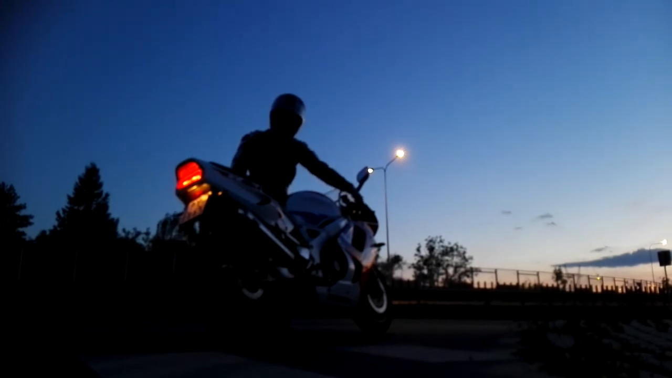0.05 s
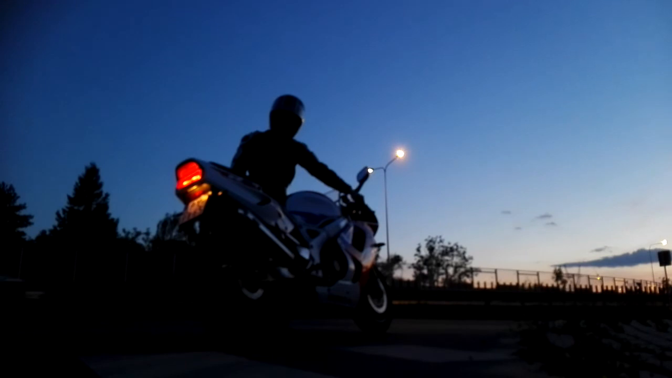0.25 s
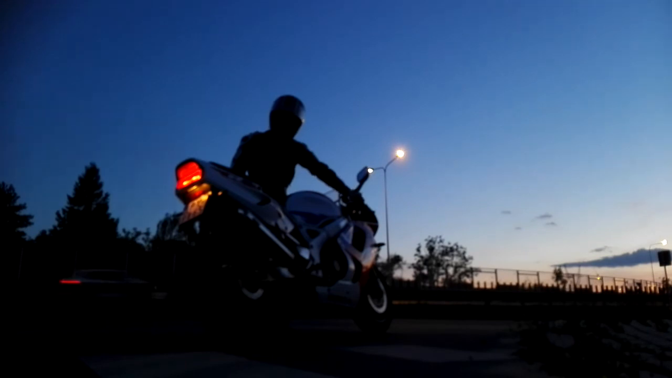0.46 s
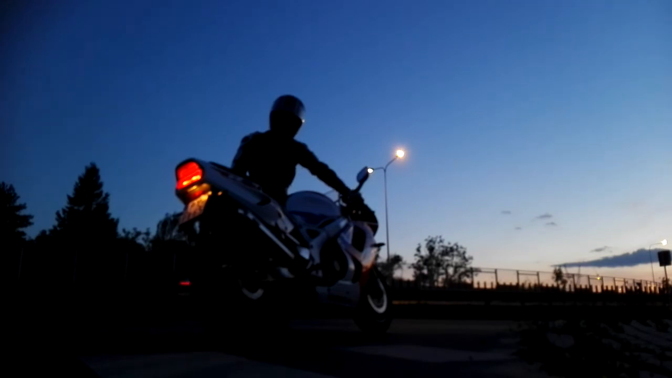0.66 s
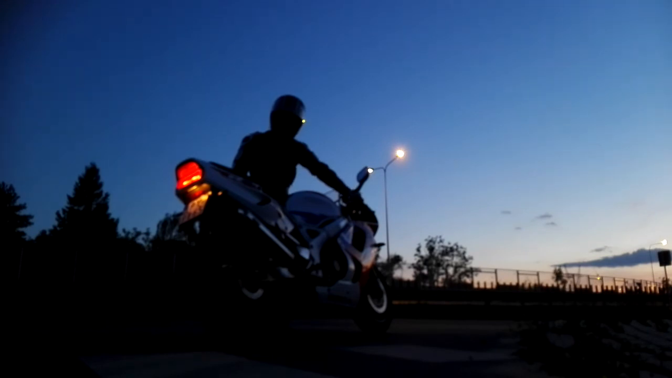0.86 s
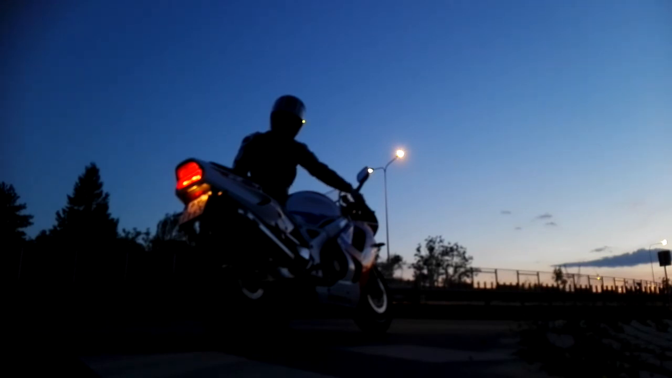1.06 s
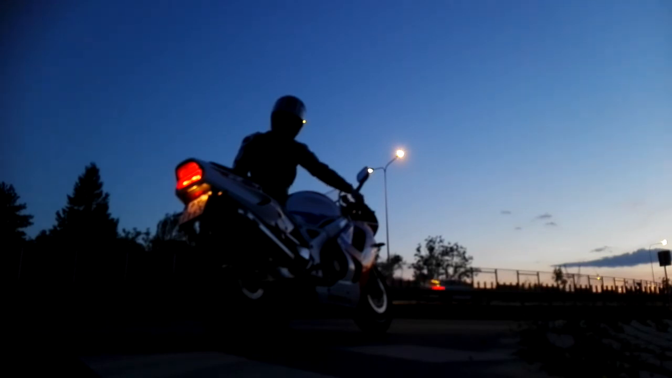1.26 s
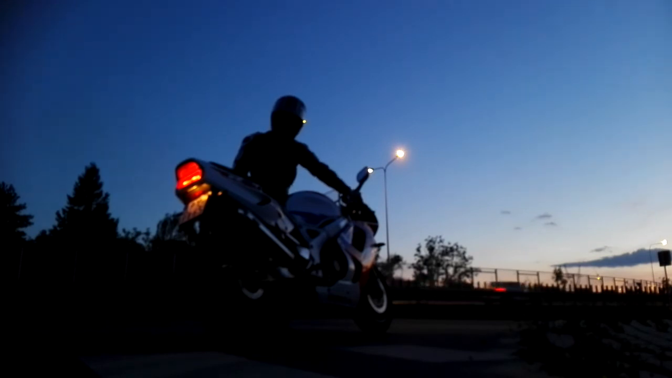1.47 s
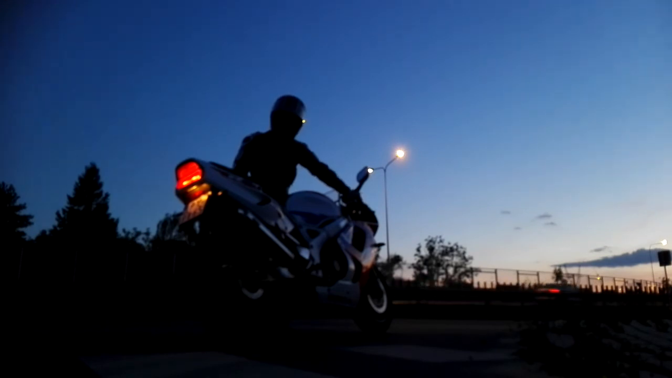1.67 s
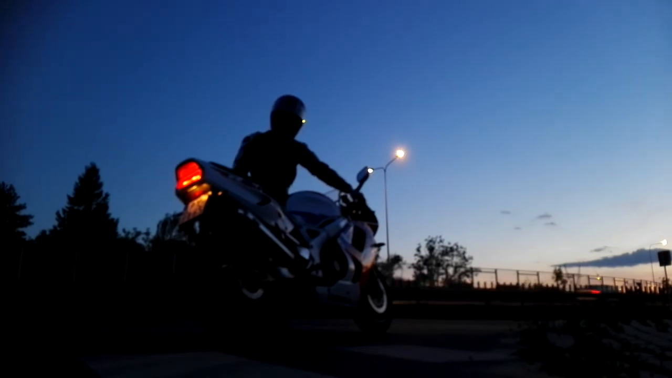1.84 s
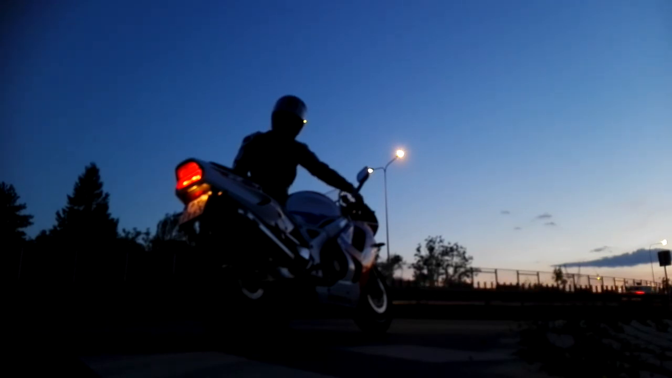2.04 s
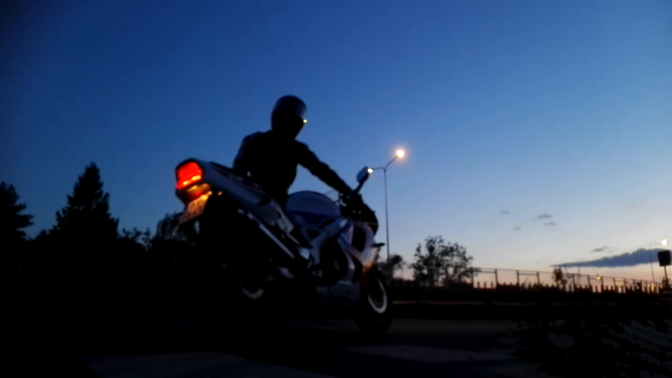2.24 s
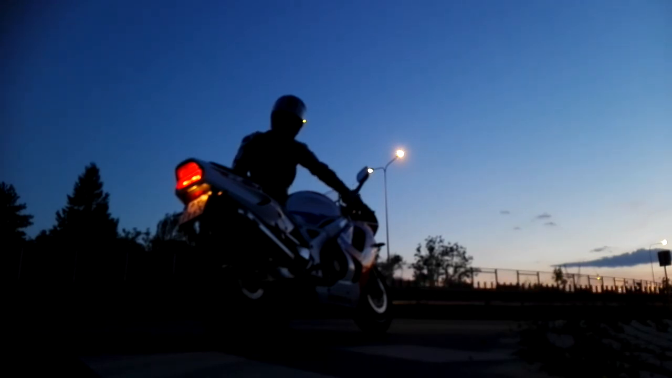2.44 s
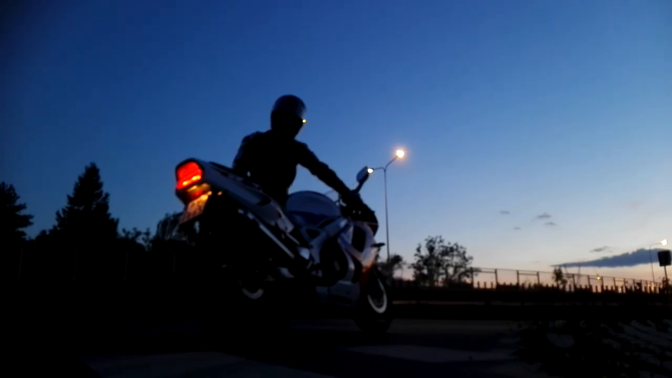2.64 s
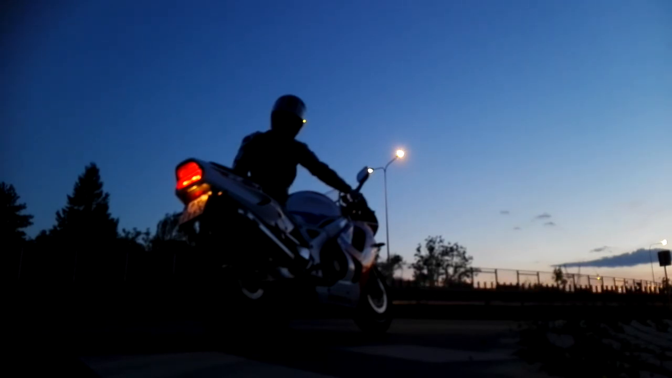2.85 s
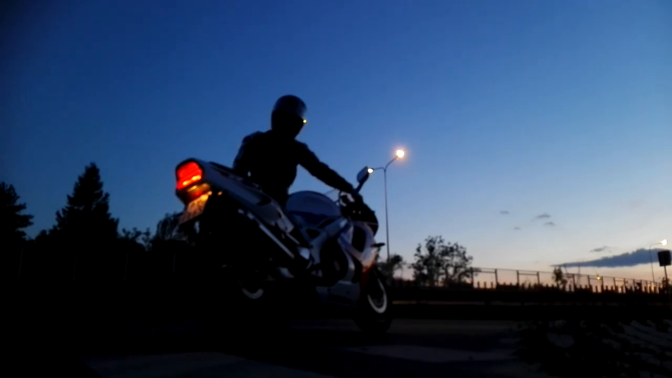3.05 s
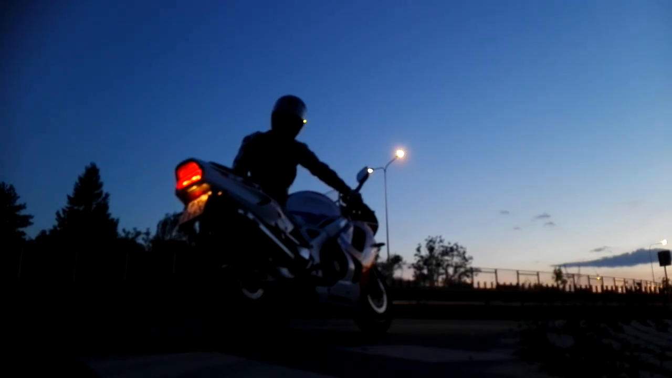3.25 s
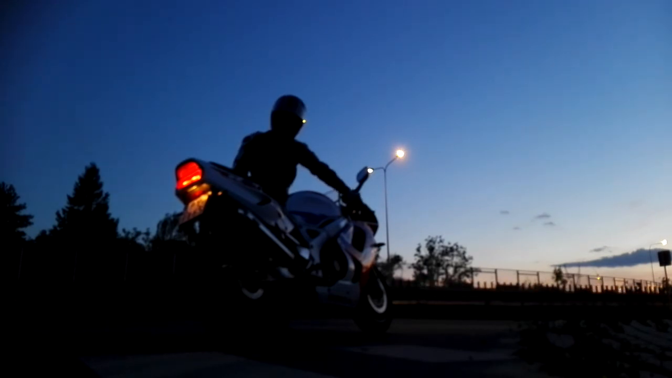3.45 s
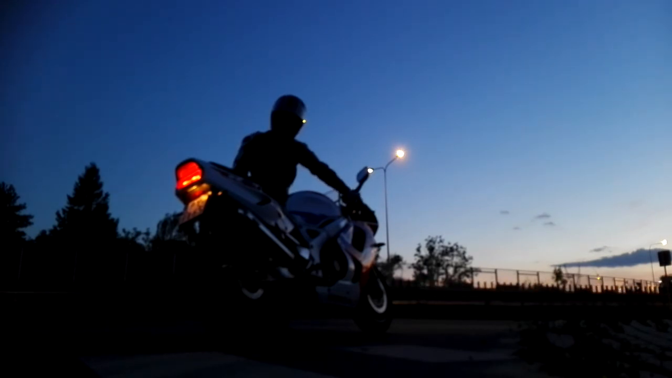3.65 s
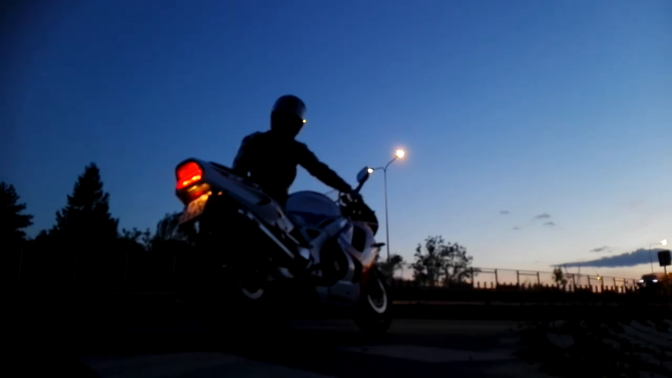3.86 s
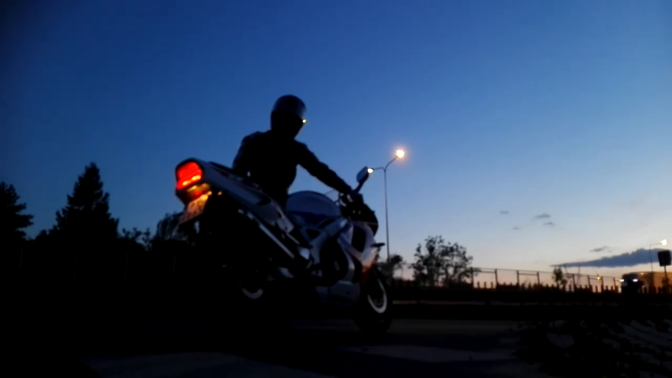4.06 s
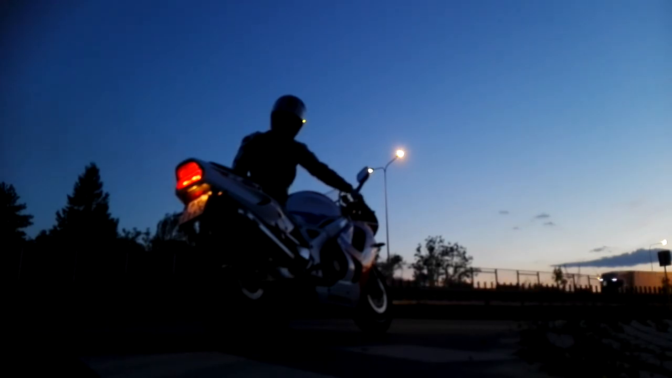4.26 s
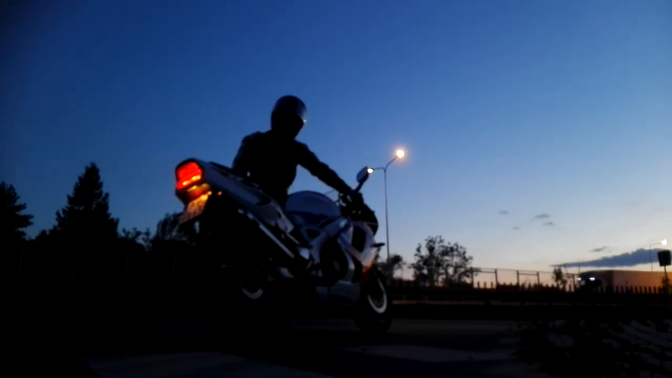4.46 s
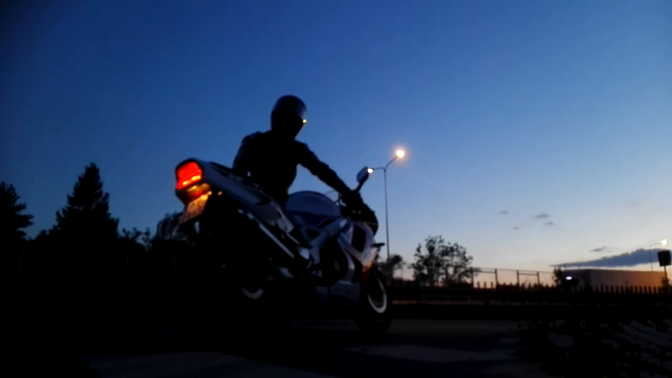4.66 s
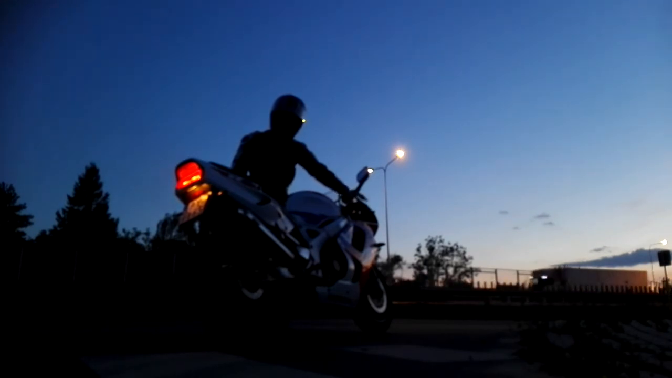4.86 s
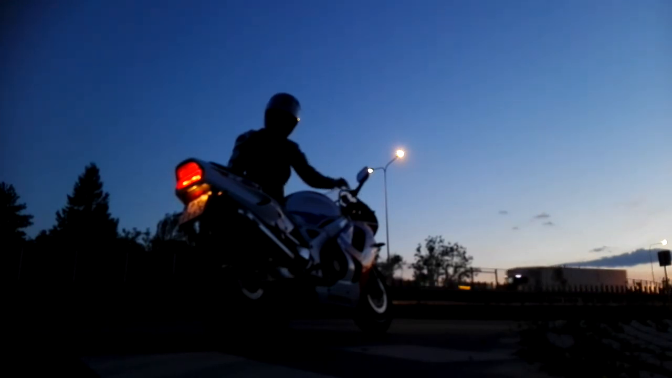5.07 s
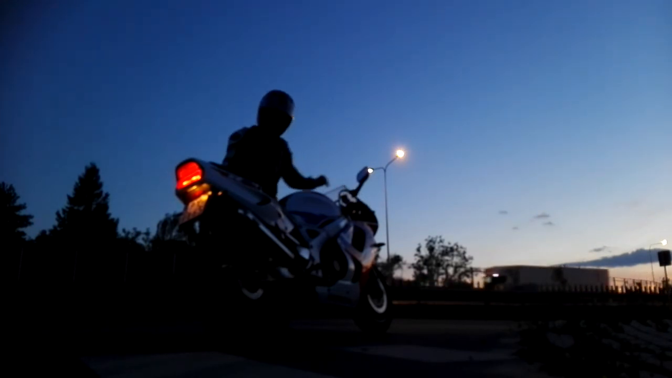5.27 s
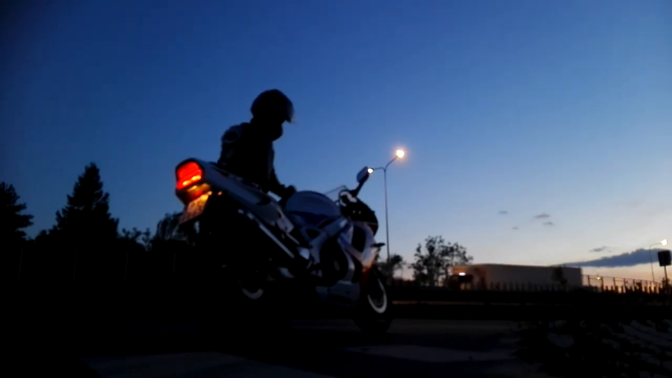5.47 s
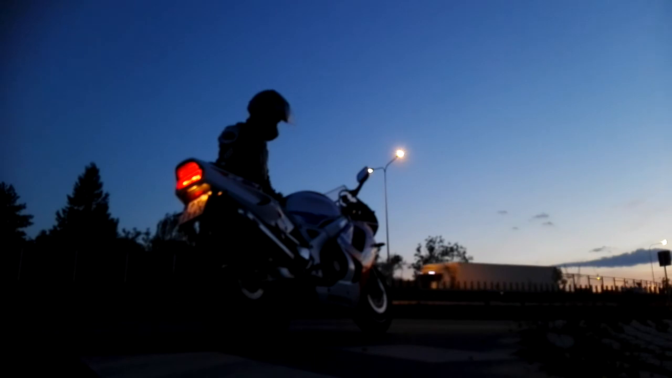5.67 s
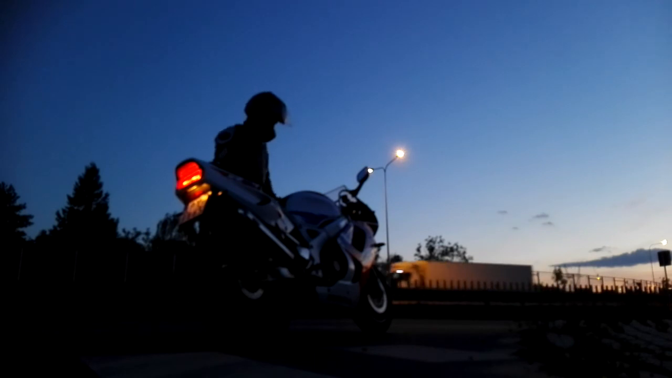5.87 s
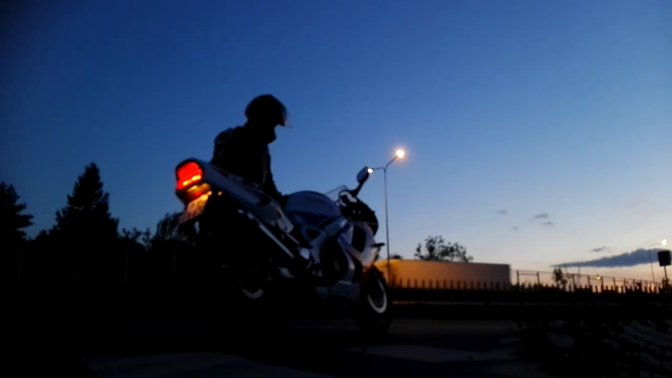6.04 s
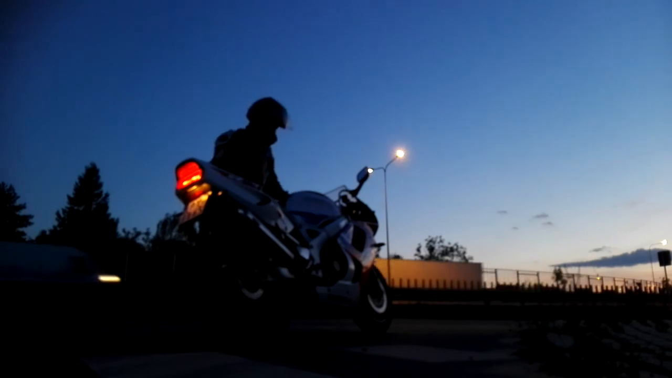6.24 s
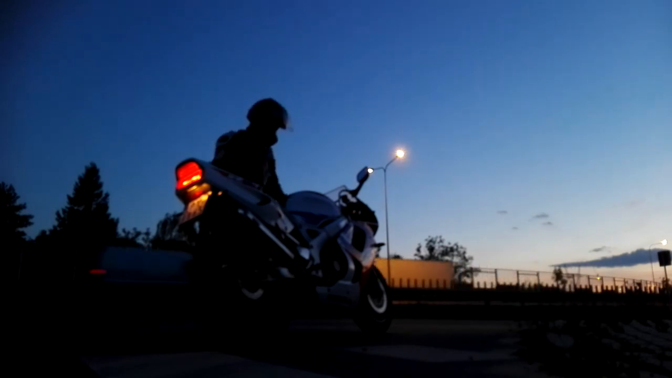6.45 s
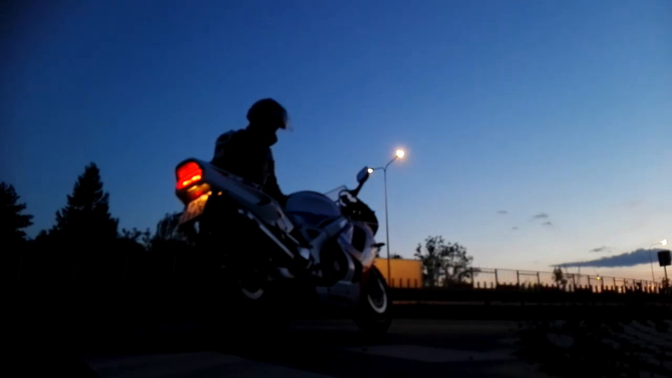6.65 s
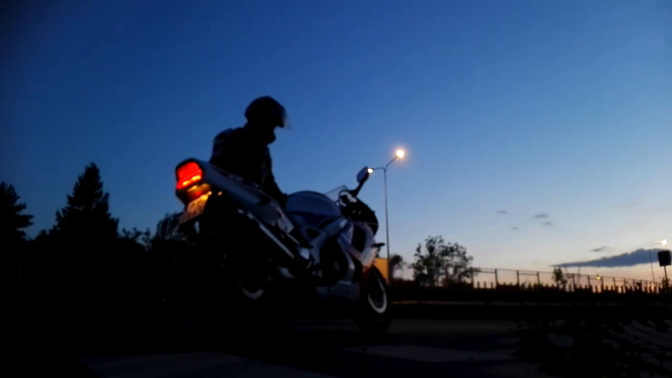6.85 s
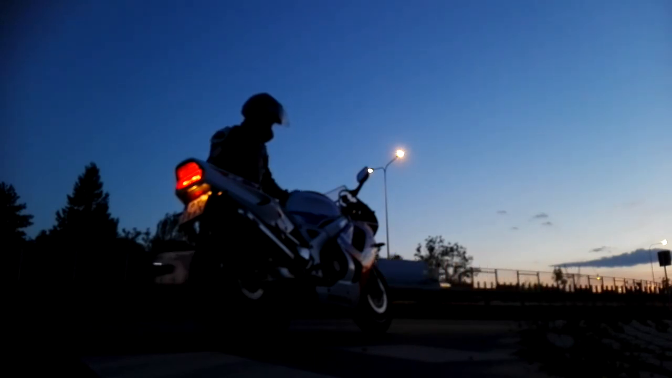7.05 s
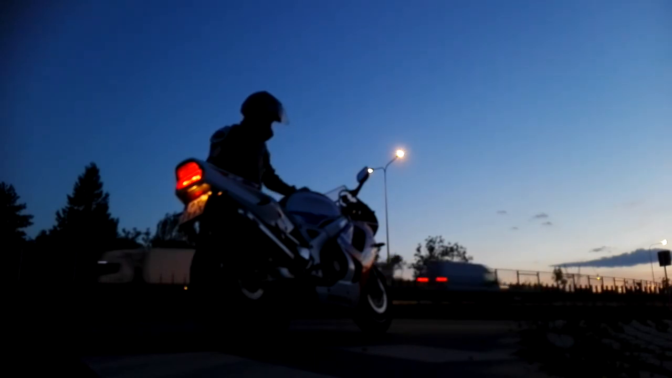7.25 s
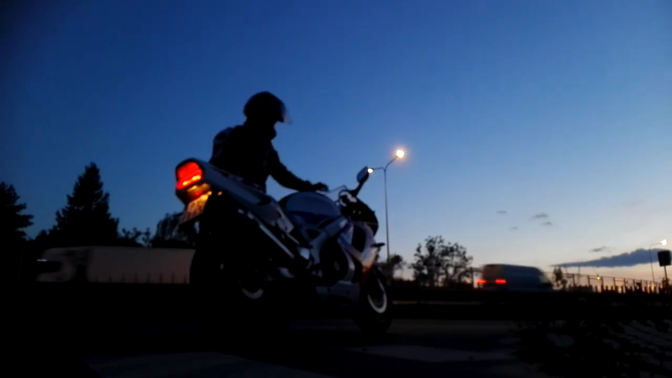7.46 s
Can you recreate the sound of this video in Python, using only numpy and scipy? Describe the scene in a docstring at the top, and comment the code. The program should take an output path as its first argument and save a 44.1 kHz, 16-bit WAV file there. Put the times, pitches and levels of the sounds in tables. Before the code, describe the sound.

Close, raspy motorbike throttle blips scream up and chop into rapid bangs, then the engine runs down to dull uneven thumps over faint traffic.

```python
"""Sport bike revving

A four-cylinder engine is revved hard through a loose, open exhaust: six blips of the throttle, then a lumpy idle.
Five blips are held against the rev limiter, which cuts the spark and chops the sound into harsh bursts.
Engine-locked sines give the tone; clicks, one a firing, ring in the pipe and can for the bark and rasp.
Shaped noise gives the rumble and the faint traffic behind; a gear whines softly as the engine slows."""
import sys
import numpy as np
from scipy import signal
from scipy.fft import rfft, irfft
from scipy.io import wavfile
from scipy.ndimage import uniform_filter1d

SR = 44100
rng = np.random.default_rng(int(sys.argv[2]) if len(sys.argv) > 2 else 0)


def output_pcm(signal):
    """Save a mono or channel-first signal as 16-bit PCM at the path in sys.argv[1].

    Samples are clipped to [-1, 1] before scaling.
    """
    pcm = np.clip(np.atleast_2d(signal).T, -1, 1) * 32767
    wavfile.write(sys.argv[1], SR, np.round(pcm).astype(np.int16))


N = 331191
TIME = np.arange(N) / SR


def from_db(db):
    """Decibels to gain."""
    return 10 ** (np.asarray(db) / 20)


def rms_one(x):
    """Scale to unit power."""
    return x / np.sqrt(np.mean(x ** 2) + 1e-20)


def evened(x):
    """Hold the power near one at every moment, judged over some 40 ms."""
    power = np.maximum(uniform_filter1d(x ** 2, size=1800), 0)
    return x / np.sqrt(power + 1e-12)


def passed(x, hz, kind, order=4):
    """Butterworth filter that lets through the lows or the highs."""
    sos = signal.butter(order, min(hz, SR / 2.2), kind, fs=SR, output="sos")
    return signal.sosfilt(sos, x)


def coloured(spectrum):
    """Noise shaped to a given spectrum, at unit power."""
    hz, db = np.transpose(spectrum)
    bins_hz = np.arange(N // 2 + 1) * SR / N
    gain = from_db(np.interp(np.log(bins_hz + 1), np.log(hz), db))
    return rms_one(irfft(rfft(rng.standard_normal(N)) * gain, N))


def drift(rate_hz):
    """Slow random wandering with a typical size of one."""
    return rms_one(passed(rng.standard_normal(N), rate_hz, "low", order=2))


def resonate(x, modes):
    """Resonances side by side, with alternating signs."""
    out = np.zeros(N)
    for k, (hz, width_hz, db) in enumerate(modes):
        r = np.exp(-np.pi * width_hz / SR)
        poles = [1, -2 * r * np.cos(2 * np.pi * hz / SR), r * r]
        gain = (-1) ** k * from_db(db) * (1 - r * r) / 2
        out += gain * signal.lfilter([1, 0, -1], poles, x)
    return out


def at_speed(rows, rate):
    """Each column of a table, read at the present firing rate."""
    hz, *columns = np.transpose(rows)
    return np.array([np.interp(rate, hz, column) for column in columns])


# Far traffic: (frequency [Hz], relative level per Hz [dB])
TRAFFIC_SPECTRUM = [(30, 3), (250, 10.5), (420, 7), (700, -16), (1100, 0), (1800, -5), (2400, -10.5),
                    (6000, -18.5), (14000, -37)]


def traffic(level_db=-70):
    """Distant road traffic is a faint, steady wash of noise."""
    return from_db(level_db) * coloured(TRAFFIC_SPECTRUM)


# Firing rates at the start, at the first touch of the limiter, held on the limiter, and at idle
START_HZ, PEAK_HZ, LIMIT_HZ, IDLE_HZ = 329, 415, 395, 41.8
# The speed grows and dies exponentially, dying a little more slowly above the knee
RISE_PER_S, FALL_PER_S, HIGH_FALL_PER_S, KNEE_HZ, SETTLE_S = 3.15, 1.14, 1.0, 300, .04


def coast(start_s, start_hz):
    """The firing rate dies away on a closed throttle and levels off at idle."""
    past_knee = TIME - start_s - np.log(start_hz / KNEE_HZ) / HIGH_FALL_PER_S
    fall = np.where(past_knee < 0, HIGH_FALL_PER_S, FALL_PER_S)
    free = KNEE_HZ * np.exp(-past_knee * fall)
    return (free ** 6 + IDLE_HZ ** 6) ** (1 / 6)  # a smooth landing on the idle


# Blips of the throttle, which also steer the throttle and the spark:
# (throttle opens [s], engine tops out [s], throttle closes [s], firing rate on closing [Hz])
THROTTLE_BLIPS = [(.395, .583, 1.011, 386), (1.395, 1.559, 1.945, 380), (2.275, 2.422, 2.945, 375),
                  (3.255, 3.407, 3.849, 388), (4.15, 4.283, 4.292, 385), (4.505, 4.623, 4.935, 384)]


def speed():
    """Firings per second: each blip climbs, overshoots, settles and coasts until the next one catches it."""
    rate = coast(0, START_HZ)
    for _, top, closes, closing_hz in THROTTLE_BLIPS:
        climb = PEAK_HZ * np.exp(RISE_PER_S * (TIME - top))
        held = np.interp(TIME, [top, top + SETTLE_S], [PEAK_HZ, LIMIT_HZ])
        blip = np.minimum.reduce([climb, held, coast(closes, closing_hz)])
        rate = np.maximum(rate, blip)
    return rate


# The throttle eases open ahead of the last blip, which takes over while it is still easing:
# (starts [s], share would be reached [s], release begins [s], share of full opening [0-1])
EASED_THROTTLE = (4.37, 4.57, 4.52, 0.85)


def throttle(opening_s=.022, closing_s=0.037):
    """How far the throttle is open, 0-1: it snaps open and shut with each blip."""
    start, eased, end, share = EASED_THROTTLE
    load = np.interp(TIME, [start, eased, end, end + opening_s], [0, share, share, 0])
    for opens, _, closes, _ in THROTTLE_BLIPS:
        times = [opens - opening_s / 2, opens + opening_s / 2, closes - closing_s / 2, closes + closing_s / 2]
        load += np.interp(TIME, times, [0, 1, 1, 0])
    return np.clip(load, 0, 1)


BANG_EVERY_S, BANG_S = .0556, .021  # spacing and length of the bangs
# Volleys of evenly spaced bangs let through by the limiter: (first bang [s], bangs [count])
BANG_VOLLEYS = [(.632, 4), (.852, 2), (.981, 1), (1.608, 4), (1.826, 2), (1.933, 1), (2.472, 4), (2.705, 1),
                (2.755, 3), (2.933, 1), (3.466, 3), (3.648, 1), (3.698, 2), (3.815, 1), (4.673, 4),
                (4.883, 1)]


def spark_cuts():
    """The spark is off from topping out until the throttle closes, except during bangs: (from, to) in s."""
    bangs = [first + k * BANG_EVERY_S for first, count in BANG_VOLLEYS for k in range(count)]
    cuts = []
    for _, top, closes, _ in THROTTLE_BLIPS:
        own = [s for s in bangs if top < s < closes]
        cuts += zip([top] + [s + BANG_S for s in own], own + [closes])
    shortest_s = .012
    return [(start, end) for start, end in cuts if end - start > shortest_s]


def limiter(fade_s=0.0046, catch_s=0.00026, reheat_s=.011):
    """How far the spark is cut (0-1), and how far the gas in the pipe has cooled (0-1)."""
    cut, cool = np.zeros(N), np.zeros(N)
    for start, end in spark_cuts():
        cut += np.interp(TIME, [start - fade_s / 2, start + fade_s / 2, end - catch_s, end], [0, 1, 1, 0])
        # the gas cools steadily until firing returns and quickly reheats it
        cool += np.interp(TIME, [start - reheat_s, end, end + reheat_s], [0, 1, 0])
    return np.clip(cut, 0, 1), cool


def crank(rate, cool, cool_delay=.46, wander=.0015):
    """Firings counted at the outlet: cool gas carries pulses more slowly, so they arrive late."""
    wandering = rate * (1 + wander * drift(23))
    return np.cumsum(wandering) / SR - cool_delay * cool  # the delay is in firing intervals


# Cylinders in firing order, before each sound scales the unevenness:
# (strength [dB], lateness [firing intervals])
CYLINDER_PATTERN = [(0, 0), (-5, .05), (-.7, -.03), (-5.5, .08)]


def pulses(turn, uneven_db, jitter, pattern=1.0):
    """One click a firing, a row for each cylinder with its own strength and timing, and some chance."""
    k = np.arange(int(turn[-1]))
    cylinder = k % len(CYLINDER_PATTERN)
    level_db, late = np.array(CYLINDER_PATTERN)[cylinder].T
    chance = rng.standard_normal((len(k), 2))
    due = k + pattern * late + jitter * chance[:, 0]
    at = np.interp(due, np.maximum.accumulate(turn), np.arange(N)).clip(0, N - 2)
    size = from_db(pattern * level_db + uneven_db * chance[:, 1].clip(-2, 2))
    # share each click between two samples, to place it finely
    whole, clicks = at.astype(int), np.zeros((len(CYLINDER_PATTERN), N))
    clicks[cylinder, whole] = size * (1 - at + whole)
    clicks[cylinder, whole + 1] = size * (at - whole)
    return clicks


def orders(turn, table):
    """Sines locked to the four-firing engine cycle, each with a random starting phase."""
    count = len(CYLINDER_PATTERN)
    total = 0
    for order, db in table:
        locked = round(count * order) / count
        total = total + from_db(db) * np.sin(2 * np.pi * (locked * turn + rng.random()))
    return np.sqrt(2) * total


def jet(clicks, decay_s, steady):
    """Each pulse tears off a puff of hiss, over a steady flow."""
    puffs = evened(signal.lfilter([1], [1, -np.exp(-1 / (decay_s * SR))], clicks))
    return evened((puffs + steady) * rng.standard_normal(N))


def headers(clicks, scatter, decay_s, own=0.36):
    """Four pipes join in pairs: a pair shares its reflections, and each pipe adds a little of its own."""
    count = len(clicks)
    pairs, single = rng.standard_normal((2, count, 400))
    fade = np.exp(-np.arange(single.shape[1]) / (decay_s * SR))
    tails = (pairs[np.arange(count) % 2] + own * single) * fade
    tails *= scatter / np.linalg.norm(tails, axis=1, keepdims=True)
    tails[:, 0] -= 1  # the pulse itself, ahead of its reflections
    return evened(signal.oaconvolve(clicks, tails, axes=1)[:, :N].sum(axis=0))


def whine(turn, rate, top_db=-67, casing_hz=2700, width_hz=350, blur=.02, teeth=25):
    """A gear whirs faintly as its tooth rate passes through the ring of its casing."""
    tone = orders(turn + blur * drift(55), [(teeth, 0)])
    ring = np.exp(-((teeth * rate - casing_hz) / width_hz) ** 2)
    return from_db(top_db) * tone * ring


# Levels of the run-down by speed: (firing rate [Hz], exhaust thumps [dB], muffler drone [dB])
RUNDOWN_LEVELS = [(41.7, -49.5, -75), (50, -52.5, -78), (61.1, -45.5, -59.5), (88, -42, -54.5),
                  (103, -40, -52.5), (179, -33.5, -38.5), (300, -46, -46)]
# Gas churning in the muffler: (frequency [Hz], relative level per Hz [dB])
DRONE_SPECTRUM = [(150, -19), (330, 11), (440, 2), (570, 8.5), (700, -3), (850, -4), (1020, -2.5),
                  (1400, -17.5), (3000, -38.5)]


def rundown(turn, rate, low_hz=40, high_hz=265, churn=0.5, bass=0.69):
    """Uneven firing makes dull thumps over churning gas, at levels set by the speed."""
    thump_db, drone_db = at_speed(RUNDOWN_LEVELS, rate)
    clicks = pulses(turn, uneven_db=0.5, jitter=0.069, pattern=.3).sum(axis=0)
    drive = clicks / np.sqrt(rate / SR) + churn * rng.standard_normal(N)
    muffle = signal.cheby1(8, 1, high_hz, fs=SR, output="sos")
    dull = signal.sosfilt(muffle, passed(drive, low_hz, "high"))
    # slow firings reach deeper
    depth = bass * np.interp(rate, [50, 150], [1.5, -.8])
    dull = dull + depth * passed(dull, 90, "low", order=1)
    return from_db(thump_db) * rms_one(dull) + from_db(drone_db) * coloured(DRONE_SPECTRUM)


# Low rumble: (frequency [Hz], relative level per Hz [dB])
RUMBLE_SPECTRUM = [(15, -4), (40, 5), (90, 1.5), (190, 4), (300, -1.5), (490, -6.5), (680, 1.5),
                   (1000, -3.5), (1600, -42)]


def rumble(rasp_db, cut, load, load_db=-21, load_slope=0.85, cut_db=-5,
           coast_db=-38, coast_slope=5.7, lumpy_db=3.5):
    """Lumpy low rumble: strong under load; while coasting it swells steeply where the rasp is strongest."""
    pulling = load * from_db(load_db + load_slope * (rasp_db + 12.0) + cut_db * cut)
    coasting = (1 - load) * from_db(coast_db + coast_slope * np.minimum(rasp_db + 19.0, 2))
    lumps = from_db(lumpy_db * np.tanh(drift(35)))
    return (pulling + coasting) * lumps * coloured(RUMBLE_SPECTRUM)


# Exhaust levels on an open throttle, before the limiter changes them:
# (firing rate [Hz], firing note [dB], its octave [dB], pipe bark [dB], rasp [dB])
PULLING_LEVELS = [(220, -35, -45, -39, -43), (247, -25, -29, -25.5, -25.5), (284, -25, -32.5, -24, -17),
                  (298.6, -18, -31, -24, -22.5), (327, -21, -25.5, -20.5, -13.5),
                  (375, -30.5, -17.5, -24, -13), (436, -31.5, -22.5, -17.5, -11.5)]
# Exhaust levels on a closed throttle, before the pipe's tuning:
# (firing rate [Hz], firing note [dB], its octave [dB], pipe bark [dB], rasp [dB])
COASTING_LEVELS = [(43, -45.5, -68, -92, -100), (60.2, -44.5, -57, -74, -73), (80, -59, -33.5, -69, -67),
                   (118, -37, -59, -60, -61), (164, -23.5, -60, -45.5, -51.5),
                   (211.4, -23.5, -43.5, -34, -38), (230.7, -26, -37.5, -28.5, -23.5),
                   (298.6, -30, -33, -29, -25), (390, -22, -36, -33, -28.5)]
# Speeds where the pipe comes into tune while coasting:
# (firing rate [Hz], half width [Hz], change of the note [dB], change of the overtones [dB])
TUNED_SPEEDS = [(225, 19, 3, 1.5), (300, 24.6, 5.5, 5), (368.5, 12.8, -4, 9.5)]


def exhaust_levels(rate, load, cut, held_db=(-2.5, -9, 1.5, 1.0)):
    """Note, octave, bark and rasp follow speed and throttle; the limiter trades tone for harshness."""
    coasting = at_speed(COASTING_LEVELS, rate)
    for hz, width_hz, note_db, overtones_db in TUNED_SPEEDS:
        nearness = np.exp(-((rate - hz) / width_hz) ** 2)
        coasting += np.outer([note_db, overtones_db, overtones_db, overtones_db], nearness)
    on_limiter = sum((TIME > top + BANG_S) & (TIME < closes + BANG_S) for _, top, closes, _ in THROTTLE_BLIPS)
    held = np.maximum(cut, on_limiter)
    pulling = at_speed(PULLING_LEVELS, rate) + np.outer(held_db, held)
    return load * pulling + (1 - load) * coasting


# Resonances of the can and its leaking joint: (frequency [Hz], width [Hz], relative level [dB])
CAN_MODES = [(2440, 1300, -3), (3398, 370, 5.5), (3697, 640, -0.5), (4406, 338, 5.5), (4794, 290, 4.5),
             (5700, 850, 0), (6424, 315, -20.5), (7076, 170, -6), (9510, 570, -5), (10480, 720, -9),
             (14000, 1400, -10)]


def rasp(turn, rough, level_db, bright_hz=6000, brightening=0.26, wide_hz=6100, wide_db=-10, widening=.4):
    """Steep fronts and hiss rattle the can, with separate high hiss of opposite sign added left and right."""
    clicks = pulses(turn, uneven_db=1.0, jitter=.001)
    firing = clicks.sum(axis=0)
    flow = np.interp(level_db, [-55, -36], [4, .25])  # feeble pulses blur into an even hiss
    hiss = jet(firing, decay_s=0.0014, steady=flow)
    fronts = headers(clicks, scatter=1.15, decay_s=.0024)
    mid = evened(passed(resonate(fronts + rough * hiss, CAN_MODES), 2700, "high"))
    # brighter when strong
    dull = passed(mid, bright_hz, "low", order=1)
    bright = from_db(brightening * np.maximum(level_db - 10.0, -45))
    side_hiss = evened(resonate(jet(firing, decay_s=.0012, steady=flow), CAN_MODES))
    side_gain = from_db(wide_db + widening * np.minimum(level_db + 14, 0))
    side_hiss = side_gain * passed(side_hiss, wide_hz, "high", order=8)
    return from_db(level_db) * (dull + bright * (mid - dull) + side_hiss * [[1], [-1]])


# Resonances of the pipe: (frequency [Hz], width [Hz], relative level [dB])
PIPE_MODES = [(590, 120, -2), (731, 72, -3.5), (1144, 73, 2.5), (1279, 680, -10.5), (1609, 52, 5),
              (1935, 86, 1)]
# Clean overtones of the firing note, before filtering:
# (multiple of the firing rate [ratio], level against the bark setting [dB])
BARK_OVERTONES = [(2.5, -27), (3, -18), (3.5, -26), (4, -16.5), (4.5, -19.5), (5, -17), (5.5, -16),
                  (6, -17.5)]


def bark(turn, rough, low_hz=740, high_hz=2150, ring_db=0.5):
    """Pulses ring in the pipe, around a core of clean overtones."""
    clicks = pulses(turn, uneven_db=.3, jitter=.0015, pattern=.5)
    hiss = .7 * rough * jet(clicks.sum(axis=0), decay_s=.0025, steady=rough)
    drive = headers(clicks, scatter=1.0, decay_s=0.004) + hiss
    ring = passed(resonate(drive, PIPE_MODES), low_hz, "high")
    ring = evened(passed(ring, high_hz, "low", order=6))
    core = passed(orders(turn, BARK_OVERTONES), high_hz, "low", order=6)
    return from_db(ring_db) * ring + core


def scream(turn, rate, centre_hz=1160, width_hz=110, top_db=-28):
    """Near the limiter the third order meets a pipe resonance and sings out."""
    return orders(turn, [(3, top_db)]) / np.hypot(1, (3 * rate - centre_hz) / (width_hz / 2))


# Half and quarter orders, at full throttle: (multiple of the firing rate [ratio], level [dB])
GROWL_ORDERS = [(.5, -33.5), (1.5, -39.5), (2.5, -29.5), (3.25, -42), (3.5, -34.5), (3.75, -28.5),
                (4.5, -38)]


def growl(turn, load, cut):
    """Sines between the main harmonics grow under load and vanish while the spark is cut."""
    return load * (1 - cut) * orders(turn, GROWL_ORDERS)


# Weak orders around the firing note: (multiple of the firing rate [ratio], level against the note [dB])
NOTE_SIDES = [(.5, -20), (.75, -40.5), (1.25, -29.5), (1.5, -22), (1.75, -31)]


def note(turn, note_db, octave_db, cut, cut_note_db=8.5, cut_octave_db=0.0):
    """The clean low tones of the exhaust: one wave a firing, its octave and weak side tones."""
    angle = 2 * np.pi * turn
    low = np.sqrt(2) * np.sin(angle) + orders(turn, NOTE_SIDES)
    octave = np.sqrt(2) * np.sin(2 * angle)
    return from_db(note_db + cut_note_db * cut) * low + from_db(octave_db + cut_octave_db * cut) * octave


def scene(cut_bark_db=-10, cut_rasp_db=-16):
    """The exhaust close by, traffic far off."""
    rate, load = speed(), throttle()
    cut, cool = limiter()
    turn = crank(rate, cool)
    note_db, octave_db, bark_db, rasp_db = exhaust_levels(rate, load, cut)
    # hiss against pulse: clean while coasting, rough under load, nearly all hiss once the pulses are feeble
    rough = np.interp(rasp_db, [-62, -48, -34], [3, .9, .14])
    rough = rough + load * np.interp(rasp_db, [-22, -11], [.2, .52])
    background = traffic() + whine(turn, rate)
    low = rundown(turn, rate) + rumble(rasp_db, cut, load ** 2)
    top = rasp(turn, 2 * rough, rasp_db + cut_rasp_db * cut)
    middle = from_db(bark_db + cut_bark_db * cut) * bark(turn, rough)
    tones = scream(turn, rate) + growl(turn, load, cut) + note(turn, note_db, octave_db, cut)
    return background + low + top + middle + tones


def record(dry, ceiling=1.25, cutoff_hz=14350):
    """The loudest peaks are rounded, and the top of the treble is cut off."""
    rounded = ceiling * np.tanh(dry / ceiling)
    sos = signal.ellip(10, .3, 70, cutoff_hz, fs=SR, output="sos")
    return signal.sosfilt(sos, rounded)


dry = scene()
out = record(dry)
output_pcm(out)
```